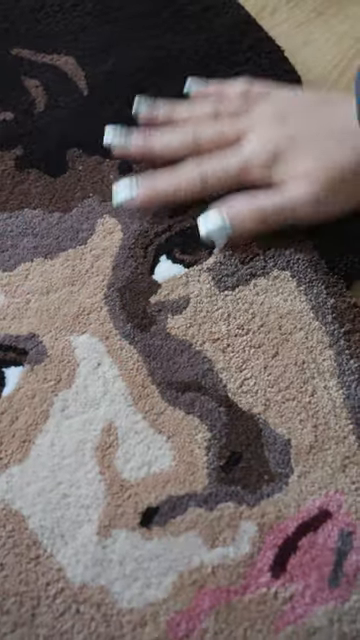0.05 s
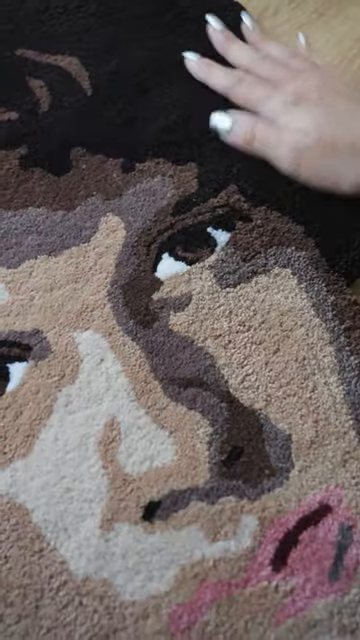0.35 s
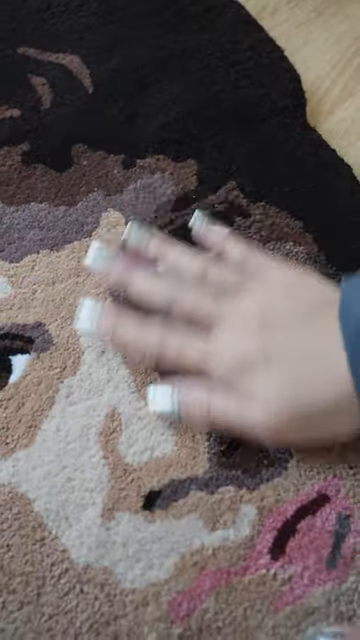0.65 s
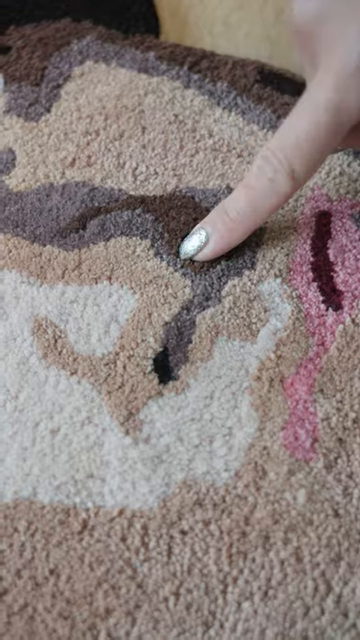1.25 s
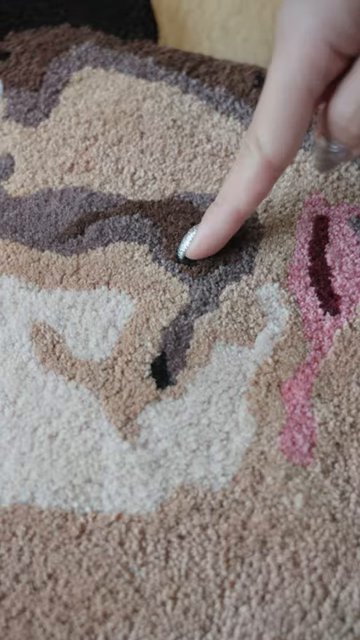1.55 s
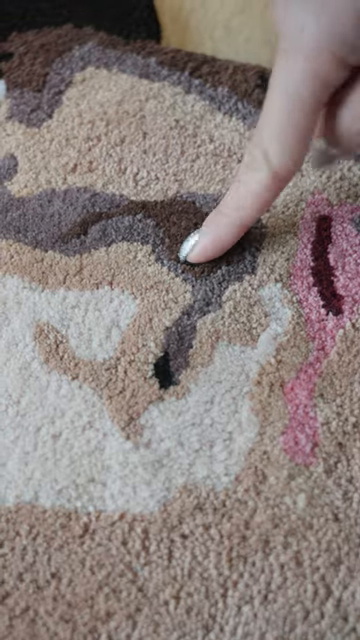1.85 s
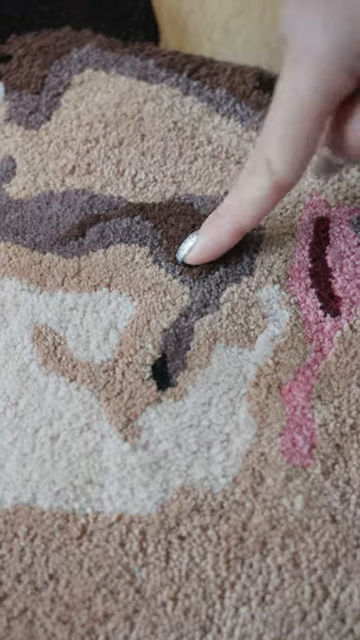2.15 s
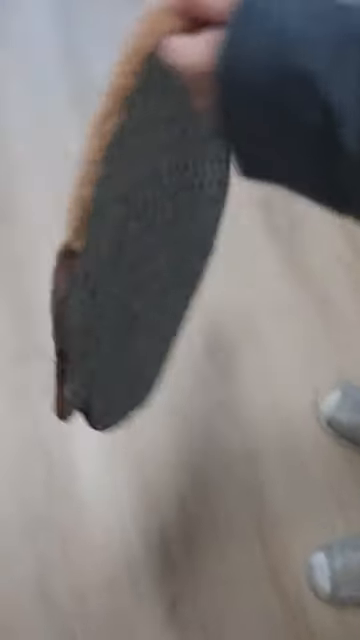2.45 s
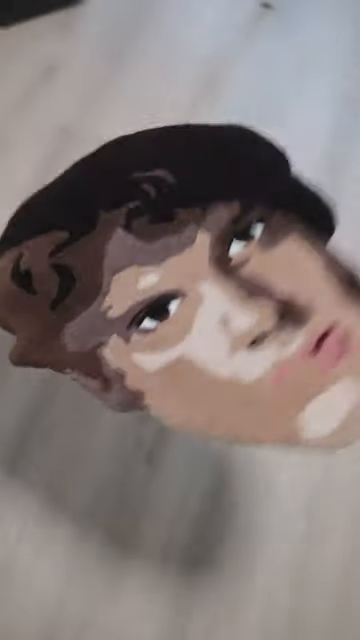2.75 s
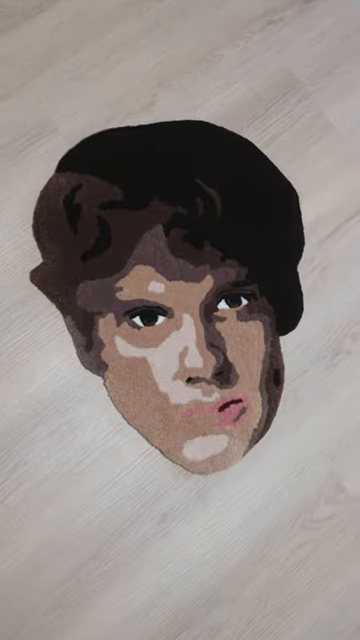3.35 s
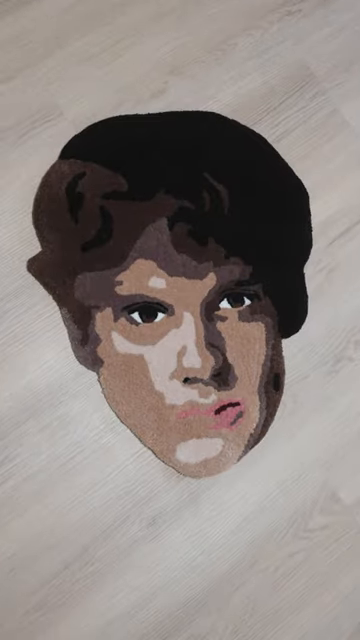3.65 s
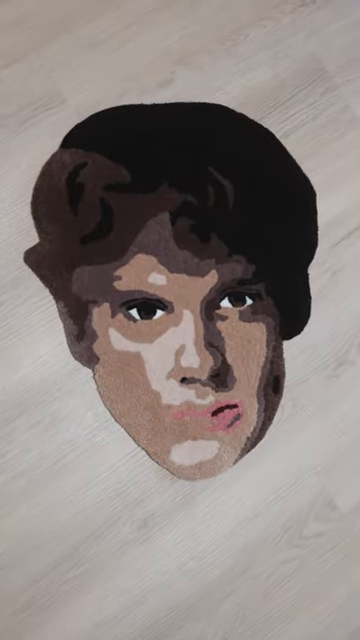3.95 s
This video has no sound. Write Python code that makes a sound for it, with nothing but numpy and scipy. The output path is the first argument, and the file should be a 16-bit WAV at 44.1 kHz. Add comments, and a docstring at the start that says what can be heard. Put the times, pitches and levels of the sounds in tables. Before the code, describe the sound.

Close rubbing on rug pile starts with a palm sweeping, followed by a fingertip scrubbing back and forth five times. After a short pause, the rug slaps down on a wooden floor in a quiet room.

```python
"""A hand rubs a tufted rug close by: the palm sweeps, then a fingertip settles and scrubs five times.
Friction bends countless fibres, which flick free as a hiss while the dragged backing rumbles
under them; a thin slide follows. The rug is then dropped flat on a wooden floor: its edges slap,
the rest patters down and the room reverberates. Faint room tone and microphone hiss lie behind."""
import sys
import numpy as np
from scipy import signal
from scipy.fft import rfft, irfft, next_fast_len
from scipy.io import wavfile
from scipy.ndimage import map_coordinates

SR = 44100
rng = np.random.default_rng(int(sys.argv[2]) if len(sys.argv) > 2 else 0)


def transcribe(u):
    """Save the signal u as a 16-bit wav file named by the first command-line argument.

    u: samples, shape (n,) or (channels, n), limited to [-1, 1]; the rate is SR.
    q: integer samples, one column per channel.
    """
    v = np.clip(np.atleast_2d(u).T, -1, 1)
    q = np.round(v * 32767).astype(np.int16)
    wavfile.write(sys.argv[1], SR, q)


N = 176400

# Palm sweep. Each row: time in seconds, level in dB, extra treble in dB.
PALM_SWEEP = [(0, -25, -3), (.12, -27.5, 2.5), (.35, -32, 2), (.42, -27.5, -4.5), (.59, -26.5, 2.5),
              (.71, -26.5, 0), (.78, -27.5, -2), (.86, -41.5, 2), (1.0, -58, 8.5)]
# Each row of a spectrum: frequency in Hz, relative level in dB.
PALM_SPECTRUM = [(30, -41), (150, -10.5), (400, -11.5), (750, -1.5), (1200, -1), (2200, -2.5), (4500, -5.5),
                 (5500, -9.5), (8800, -12), (15500, -22)]
# Rasp, cut off before full speed. One row: start, full-speed time and end in seconds,
# full-speed level in dB, resonance in Hz.
RASP_STROKE = (-0.1, 1.1, 0.66, -37, 1500.5)
def palm():
    """Sliding friction: many fibres flick free and sum to a hiss of varying level and brightness."""
    level_db, treble_db = curves(PALM_SWEEP)
    hiss = coloured(flicks(rate=150000), PALM_SPECTRUM)
    treble = filtered(hiss, lambda hz: 1 - 1 / (1 + (hz / 4500) ** 4))
    start, fastest, end, rasp_db, rasp_hz = RASP_STROKE
    motion = speed(np.arange(N) / SR, start, fastest, end)
    rasp = amp(rasp_db) * motion * resonance(np.full(N, rasp_hz))
    return fading(PALM_SWEEP) * (hiss + (amp(treble_db) - 1) * treble) + rasp


# Each entry: time in seconds at which the finger reverses.
TURN_TIMES = [1.362, 1.586, 1.794, 1.971, 2.129, 2.342]
# Strokes between turns. Each row: fastest moment in seconds, then, at that speed, levels of hiss,
# lower and upper resonance in dB, lower resonance in Hz.
FINGER_STROKES = [(1.555, -28.5, -34, -34, 2590), (1.665, -29.5, -37.5, -44.5, 2248),
                  (1.929, -29, -46, -45, 2148), (2.049, -31, -40, -40.5, 2600),
                  (2.245, -29, -41.5, -42, 2435)]
# Snags of the fingertip. Each row: time in seconds, added level in dB.
SNAG_SWELLS = [(1.495, 1), (1.703, 5), (1.937, 2), (2.245, 1)]
SCRUB_SPECTRUM = [(300, -22.5), (700, -1), (1300, -5), (2000, 3.5), (3400, 0.5), (4500, -0.5), (6800, 0.5),
                  (8000, -3.5), (11000, -6.5), (15500, -13.5)]
def scrubbing():
    """Friction noise grows with speed and two broad resonances rise in pitch; snags swell it all."""
    t, strokes = np.arange(N) / SR, np.zeros(N)
    rest_s, snag_half_s, turn_db = .005, .028, -15
    pitch_bend, upper_ratio = .12, 1.82
    tufts = clumps(rate=270, depth_db=.8)
    hiss = coloured(flicks(rate=90000) * tufts, SCRUB_SPECTRUM)
    for start, end, stroke in zip(TURN_TIMES, TURN_TIMES[1:], FINGER_STROKES):
        fastest, hiss_db, lower_db, upper_db, hz = stroke
        drive = speed(t, start + rest_s, fastest, end - rest_s) ** .61
        centre_hz = hz * (1 + pitch_bend * (drive - 1))
        rasp = amp(lower_db) * resonance(centre_hz) + amp(upper_db) * resonance(centre_hz * upper_ratio)
        gain = np.maximum(drive, amp(turn_db)) * (t >= start) * (t < end)
        strokes += gain * (amp(hiss_db) * hiss + tufts * rasp)
    swell_db = sum(db * np.exp(-((t - s) / snag_half_s) ** 2) for s, db in SNAG_SWELLS)
    return strokes * amp(swell_db)


# Settling finger. Each row: time in seconds, level in dB.
SETTLE_LEVELS = [(.78, -45.5), (.88, -38), (.98, -36), (1.12, -45.5), (1.34, -50), (1.42, -75)]
SETTLE_SPECTRUM = [(300, -21), (900, -15), (1500, -9.5), (2500, -3), (3300, -8), (4600, -8.5),
                   (8000, -16.5), (15000, -29.5)]
def fingertip():
    """Light friction releases fibres in clumps as the finger comes to rest in the pile."""
    fibres = flicks(rate=40000) * clumps(rate=110, depth_db=1.5)
    return fading(SETTLE_LEVELS) * coloured(fibres, SETTLE_SPECTRUM)


# Rustle under pressure. Each row: time in seconds, level in dB.
PRESS_LEVELS = [(0, -35), (.5, -38), (.75, -35.5), (1.02, -34.5), (1.25, -38.5), (1.7, -34.5),
                (2.31, -37.5), (2.385, -50)]
PRESS_SPECTRUM = [(25, -40), (130, -10), (240, -1), (390, 0.5), (600, -2.5), (1000, -9.5), (1600, -9.5),
                  (2000, -20), (5000, -29.5)]
def backing():
    """Friction at the roots of the tufts makes a dull rustle while the hand presses."""
    return fading(PRESS_LEVELS) * coloured(flicks(rate=14000), PRESS_SPECTRUM)


# Drags on the backing. Each row: start and end in seconds, level at full speed in dB.
BACKING_DRAGS = [(0, 0.432, -41.5), (0.571, 0.82, -36.5), (0.918, 1.111, -37.5), (1.4, 1.537, -31),
                 (1.633, 1.766, -30), (1.815, 1.984, -32.5), (2.036, 2.132, -31.5), (2.162, 2.344, -31.5)]
RUMBLE_SPECTRUM = [(25, -56), (45, -38), (70, -13.5), (130, 0), (210, -1.5), (400, -7.5), (1500, -48)]
def tugging():
    """Forced vibration: the dragged backing rumbles, growing as a power of the hand's speed."""
    t = np.arange(N) / SR
    drag = sum(amp(db) * speed(t, start, (start + end) / 2, end) ** .32
               for start, end, db in BACKING_DRAGS)
    return drag * coloured(flicks(rate=1500), RUMBLE_SPECTRUM)


# Tufts snapping back. Each row: start in seconds, level before filtering in dB.
TUFT_SNAPS = [(1.511, -17.5), (1.719, -24), (1.747, -14), (2.077, -22), (2.243, -19)]
def thumps():
    """Stick-slip: a bunch of tufts escapes the finger and knocks the backing into damped vibration."""
    ring_hz, t60_s = 158, .04
    t, knocks = np.arange(SR // 8) / SR, np.zeros(N)
    for start, db in TUFT_SNAPS:
        add(knocks, start, -amp(db - 60 * t / t60_s) * np.sin(2 * np.pi * ring_hz * t))
    return cut(knocks, 72.5, "highpass")


# Closing slide. Each row: time in seconds, level in dB.
SLIDE_LEVELS = [(2.28, -67), (2.35, -44), (2.49, -52.5), (2.58, -78)]
SLIDE_SPECTRUM = [(200, -10), (900, -1.5), (2200, -1.5), (4200, 4), (8000, 0.5), (10500, -11), (15500, -21)]
def slide():
    """Smooth sliding friction on the fabric gives a thin rub."""
    started = np.arange(N) / SR > SLIDE_LEVELS[0][0]
    return fading(SLIDE_LEVELS) * started * coloured(flicks(rate=7300), SLIDE_SPECTRUM)


# Rug meeting the floor. Each row: time in seconds, patter level in dB, pile hiss level in dB.
LANDING_LEVELS = [(2.93, -78, -73.5), (2.992, -42.5, -56), (2.996, -20, -40), (3.05, -20, -50.5),
                  (3.08, -24, -39.5), (3.125, -21, -37), (3.17, -28.5, -44), (3.24, -32.5, -57),
                  (3.45, -75, -110)]
PATTER_SPECTRUM = [(30, -46), (90, -30), (160, -9), (245, 1), (335, -8), (490, 0.5), (610, -1), (760, 0.5),
                   (970, -8.5), (1200, -7), (1700, -12.5), (2800, -19.5), (5000, -32.5), (12000, -56)]
PILE_SPECTRUM = [(600, -11), (2500, -5.5), (4000, 0.5), (7000, -2.5), (10000, -17), (15500, -41)]
# Edge slaps before filtering. Each row: start in seconds, ring level in dB, ring frequency in Hz,
# 60 dB decay time in seconds, crack level in dB.
EDGE_SLAPS = [(2.993, -5, 1105, 0.0027, -15), (3.008, -17, 470, 0.13, -24), (3.0676, -7.5, 790, 0.03, -8)]
def drop():
    """Distributed impact: contact runs across the rug as a patter, while edges crack and ring."""
    patter_db, pile_db = curves(LANDING_LEVELS, outside=-140)
    patter = amp(patter_db) * coloured(flicks(rate=16000), PATTER_SPECTRUM)
    pile = amp(pile_db) * coloured(flicks(rate=7000), PILE_SPECTRUM)
    t, slaps = np.arange(SR // 10) / SR, np.zeros(N)
    crack_t60_s = .005
    for start, ring_db, hz, t60_s, crack_db in EDGE_SLAPS:
        ring = amp(ring_db - 60 * t / t60_s) * np.sin(2 * np.pi * hz * t)
        crack = rng.standard_normal(len(t)) * amp(crack_db - 60 * t / crack_t60_s)
        add(slaps, start, ring + cut(crack, 4800, "lowpass"))
    return patter + pile + cut(slaps, 250, "highpass")


# Room decay. Each row: frequency in Hz, 60 dB decay time in seconds.
REVERB_TIMES = [(250, .47), (520, .42), (740, .53), (1100, .43), (10000, .33)]
def room(x, level_db=-9, delay_s=.006):
    """Reverberation: a diffuse field decays exponentially, each frequency at its own rate."""
    hz, t, spectra = signal.stft(rng.standard_normal(SR * 3 // 4), SR, nperseg=256)
    decay = amp(-60 * t / along(REVERB_TIMES, hz)[:, None])
    tail = signal.istft(spectra * decay, SR, nperseg=256)[1]
    tail = np.pad(tail, (round(delay_s * SR), 0))
    return amp(level_db) * signal.fftconvolve(x, tail / np.linalg.norm(tail))[:N]


# Self-noise. Each row: time in seconds, level in dB.
HISS_LEVELS = [(2.36, -52), (2.42, -84)]
HISS_SPECTRUM = [(100, -16.5), (500, 9), (2000, -17.5), (8000, 7.5), (15500, 7.5)]
def microphone_hiss():
    """Self-noise, uncorrelated between the channels, falls away as the scrubbing ends."""
    return amp(curves(HISS_LEVELS)[0]) * coloured(rng.standard_normal((2, N)), HISS_SPECTRUM)


# Faint background treble. Each row: time in seconds, level in dB.
AIR_LEVELS = [(2.58, -70), (2.69, -63), (2.94, -63.5), (3.4, -78.5), (3.55, -67.5), (3.76, -78),
              (3.96, -69)]
AIR_SPECTRUM = [(400, -13.5), (750, -1), (4400, -3), (9000, -10), (15500, -21)]
ROOM_TONE_SPECTRUM = [(25, -29), (160, -3), (390, 0.5), (1300, -9.5), (15500, -34)]
def background(tone_db=-68):
    """Ambient noise: steady room tone under a hiss whose level drifts."""
    tone, air = rng.standard_normal((2, N))
    drift = amp(curves(AIR_LEVELS)[0])
    return amp(tone_db) * coloured(tone, ROOM_TONE_SPECTRUM) + drift * coloured(air, AIR_SPECTRUM)


def flicks(rate):
    """Shot noise: a Poisson stream of impulses of random size, rate a second."""
    return unit(np.sqrt(rng.poisson(rate / SR, N)) * rng.standard_normal(N))


def clumps(rate, depth_db):
    """Random amplitude modulation: fibres let go tuft by tuft."""
    knots = rng.standard_normal(8192)
    wander = map_coordinates(knots, [np.arange(N) * rate / SR], mode="wrap")
    return unit(amp(depth_db * wander))


def speed(t, start, fastest, end):
    """Relative speed (0-1): a quarter sine up from rest and another back down."""
    rise = (t - start) / max(fastest - start, .01)
    fall = (end - t) / max(end - fastest, .01)
    return np.sin(np.pi / 2 * np.clip(np.minimum(rise, fall), 0, 1))


def resonance(centre_hz, width_hz=750):
    """Quadrature modulation carries a band of noise along a moving centre frequency."""
    a, b = filtered(rng.standard_normal((2, N)), lambda hz: 1 / (1 + (2 * hz / width_hz) ** 2))
    phase = 2 * np.pi * np.cumsum(centre_hz) / SR
    return unit(a * np.cos(phase) + b * np.sin(phase))


def amp(db):
    """Decibels to gain."""
    return 10 ** (np.asarray(db) / 20)


def unit(x):
    """Normalisation to rms 1."""
    return x / np.sqrt(np.mean(x ** 2) + 1e-20)


def along(points, hz):
    """Interpolation of (Hz, value) points on a log frequency axis."""
    frequencies, values = np.transpose(points)
    return np.interp(np.log(hz + 1), np.log(frequencies + 1), values)


def curves(rows, outside=None):
    """Linear interpolation, per sample, of each column after the time."""
    times, *columns = np.transpose(rows)
    return [np.interp(np.arange(N) / SR, times, column, outside, outside) for column in columns]


def fading(rows):
    """Amplitude envelope from times and dB levels, silent after the last row."""
    return amp(curves(rows)[0]) * (np.arange(N) / SR < rows[-1][0])


def filtered(x, response):
    """Zero-phase filtering: the spectrum times a frequency response."""
    size = next_fast_len(N + SR // 2)
    return irfft(rfft(x, size) * response(np.fft.rfftfreq(size, 1 / SR)), size)[..., :N]


def coloured(x, spectrum):
    """Spectral shaping by rows of frequency in Hz and relative level in dB, at rms 1."""
    return unit(filtered(x, lambda hz: amp(along(spectrum, hz))))


def cut(x, hz, kind):
    """A causal second-order high- or low-pass."""
    return signal.sosfilt(signal.butter(2, hz, kind, fs=SR, output="sos"), x)


def add(track, start_s, sound):
    """Superposition of a sound on the track."""
    start = round(start_s * SR)
    track[start:start + len(sound)] += sound[:N - start]


def scene():
    """Superposition: every source is central; only the microphone hiss is wide."""
    rubbing = palm() + fingertip() + backing() + scrubbing() + tugging() + thumps() + slide()
    landing = drop()
    return rubbing + landing + room(landing) + background() + microphone_hiss()


def record(dry, top_hz=15800):
    """Band limiting: an ideal low-pass removes the highest treble."""
    return filtered(dry, lambda hz: hz < top_hz)


dry = scene()
out = record(dry)
transcribe(out)
```